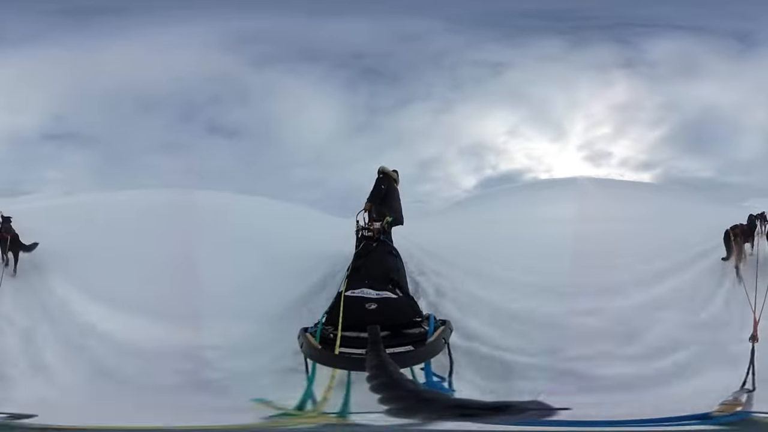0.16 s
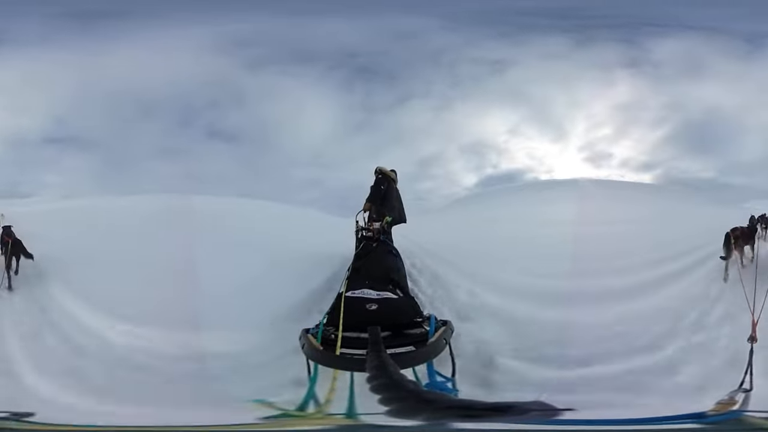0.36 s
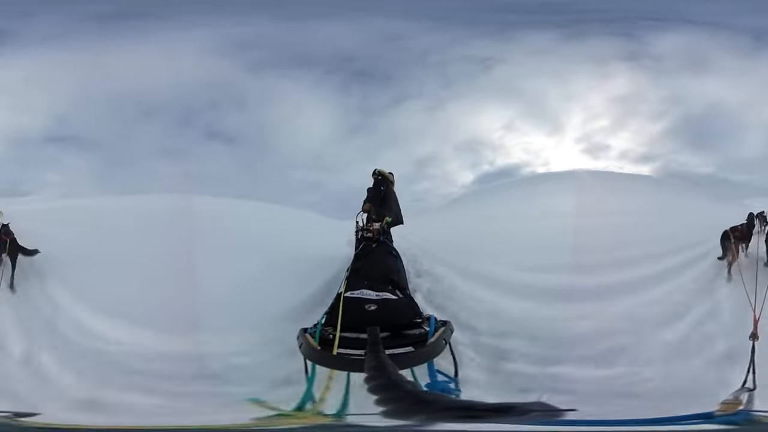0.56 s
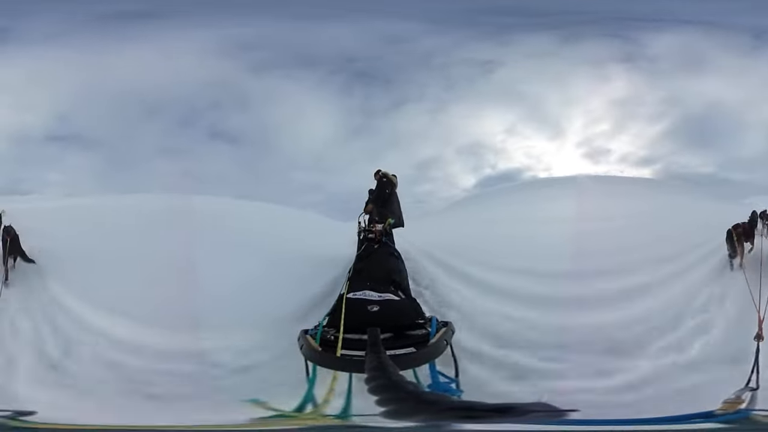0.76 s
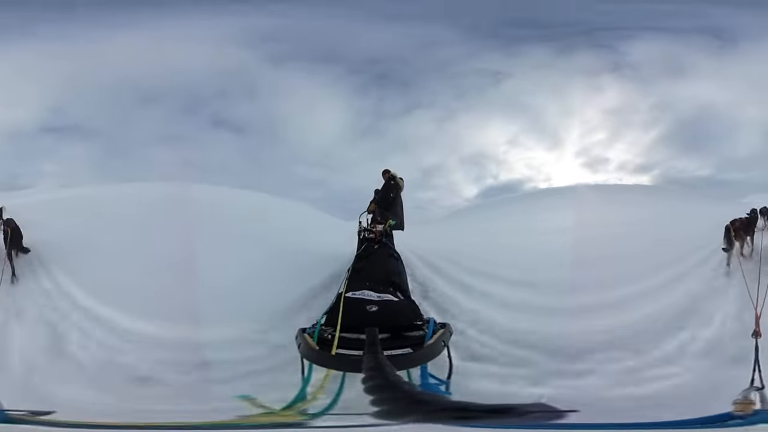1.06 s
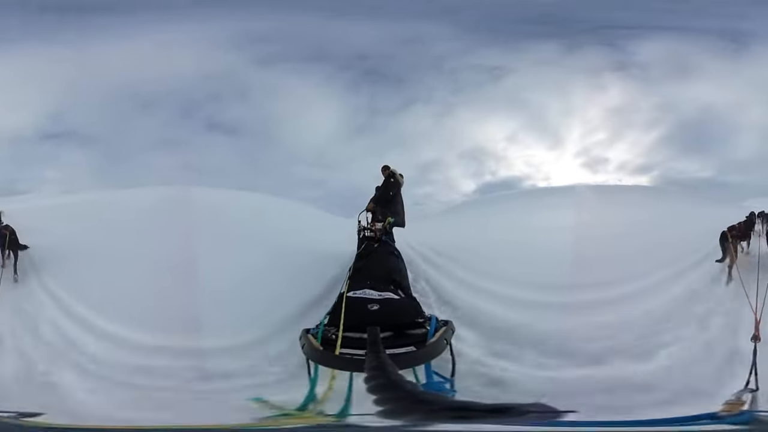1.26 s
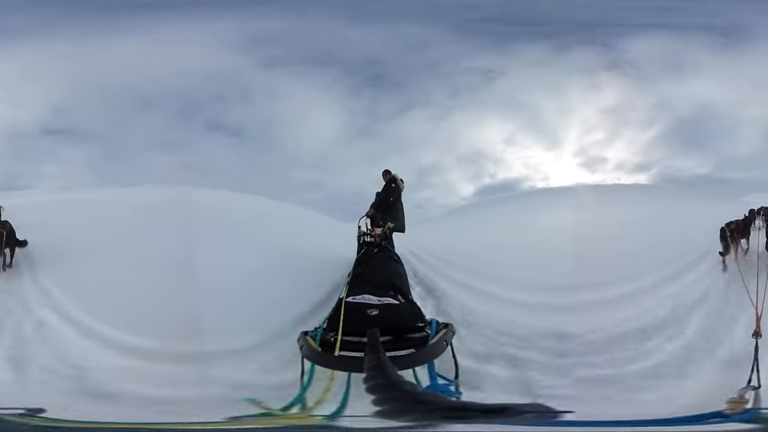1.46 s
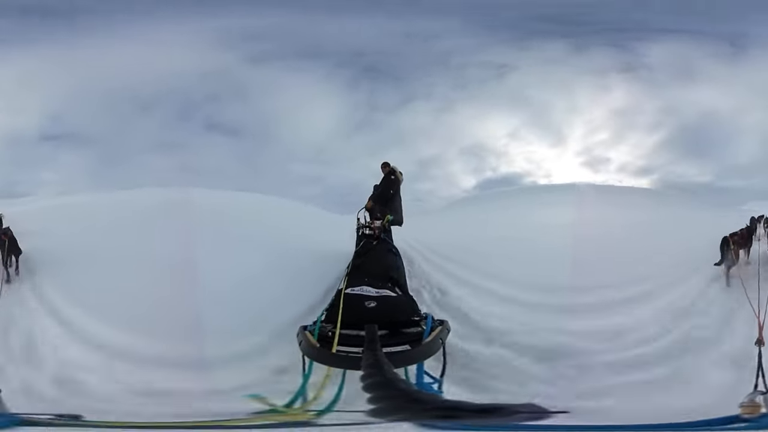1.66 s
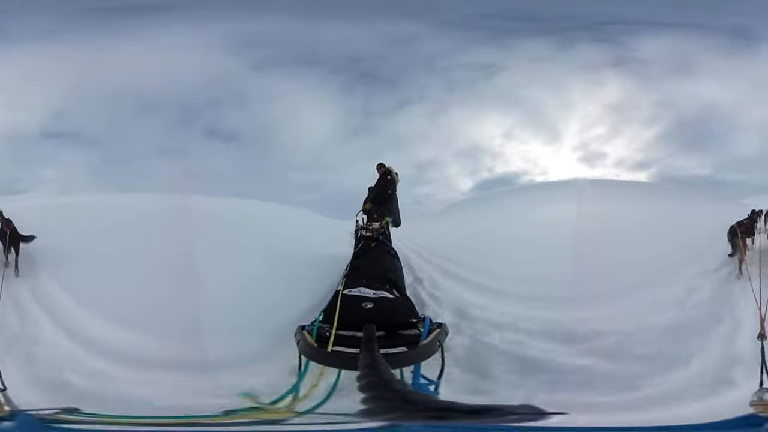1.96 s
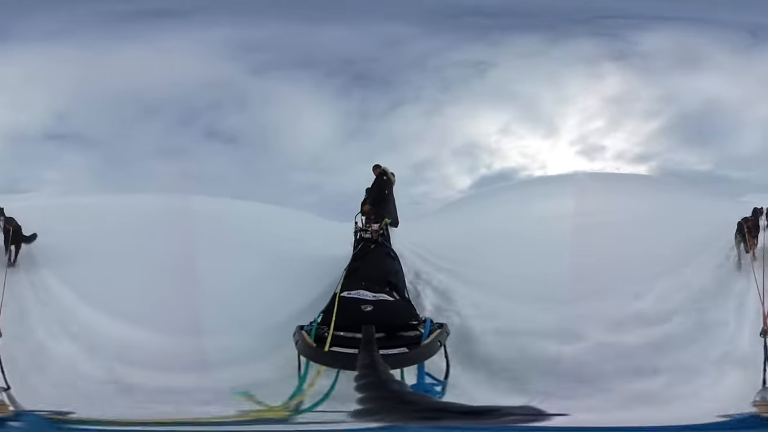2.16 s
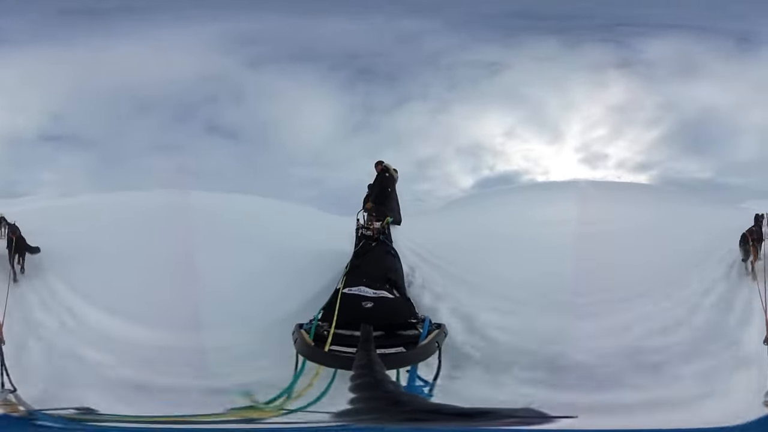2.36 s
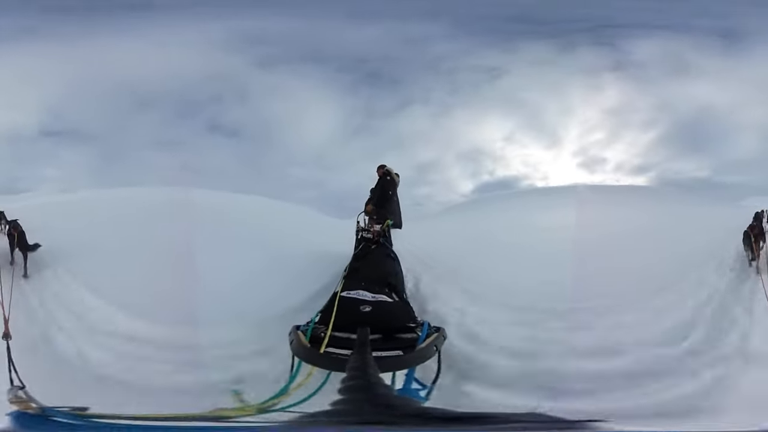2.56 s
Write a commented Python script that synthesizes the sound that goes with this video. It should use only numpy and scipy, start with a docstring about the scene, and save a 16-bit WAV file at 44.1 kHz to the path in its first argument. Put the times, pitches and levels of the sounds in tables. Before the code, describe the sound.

Dog sled runners crunch over packed snow, with a hollow frame drone, jolts and ticking ice crumbs

```python
"""An open field of packed snow: a dog sled runs over it, heard from a mount on the sled's bow.
The runners crunch through breaking snow grains and keep the frame droning near 400 Hz.
Fine snow and ice crumbs set the housing ringing, a little wind rumbles, and the sled thuds softly.
Bumps add a burst of crushed snow and a juddering tone of the frame; the hardest overload the microphone."""
import sys
import numpy as np
from scipy import signal
from scipy.fft import rfft, irfft, next_fast_len
from scipy.io import wavfile
from scipy.ndimage import uniform_filter1d

SR = 44100
rng = np.random.default_rng(int(sys.argv[2]) if len(sys.argv) > 2 else 0)


def to_wav(sig):
    """Store sig (one row per channel, or 1-D mono) as 16-bit WAV at the path in sys.argv[1].

    Samples outside -1..1 are clipped; the rate is SR.
    """
    pcm = np.clip(np.atleast_2d(sig), -1, 1) * 32767
    pcm = np.round(pcm).astype(np.int16)
    wavfile.write(sys.argv[1], SR, pcm.T)  # frames by channels


N = 120393  # length in samples
TIME = np.arange(N) / SR


def from_db(db):
    """Turn decibels into a gain."""
    return 10 ** (np.asarray(db) / 20)


def rms_one(x):
    """Scale a sound to an average strength (rms) of 1."""
    return x / np.sqrt(np.mean(x ** 2) + 1e-20)


def in_time(rows):
    """Join the points of a table by straight lines over time."""
    return np.interp(TIME, *np.transpose(rows))


def drift(hz):
    """Smooth random wandering with spread 1; a higher hz wanders faster."""
    step = 40  # make one value every 40 samples, then join them
    r = np.exp(-2 * np.pi * hz * step / SR)
    noise = rng.standard_normal(N // step + 2002)
    slow = signal.lfilter([1], [1, -2 * r, r * r], noise)[2000:]  # skip the start-up
    return np.interp(np.arange(N) / step, np.arange(len(slow)), rms_one(slow))


def colour(x, points):
    """Filter a sound to follow a spectrum without smearing it backwards in time; rms 1."""
    size = 2 * next_fast_len(N)
    hz, db = np.transpose(points)
    bins_hz = np.arange(size // 2 + 1) * SR / size
    shape_db = np.interp(np.log(bins_hz + 1), np.log(hz), db)
    # keeping only the first half of the cepstrum makes the filter act forwards in time
    cepstrum = irfft(np.log(from_db(shape_db)))
    cepstrum[size // 2:] = 0
    response = np.exp(2 * rfft(cepstrum))
    return rms_one(irfft(rfft(x, size) * response)[:N])


def ring(x, hz, t60):
    """Each unit click starts a sine of height 1 that dies away by 60 dB in t60 seconds."""
    r = from_db(-60 / (t60 * SR))
    w = 2 * np.pi * hz / SR
    return signal.lfilter([0, np.sin(w)], [1, -2 * r * np.cos(w), r * r], x + 1e-18)


def resonate(x, hz, width):
    """Pass a sound through one resonance, width in Hz; rms 1."""
    r = np.exp(-np.pi * width / SR)
    w = 2 * np.pi * hz / SR
    return rms_one(signal.lfilter([1, 0, -1], [1, -2 * r * np.cos(w), r * r], x))


def grains(per_s, spread_db):
    """Clicks at random moments, many small and a few large."""
    sizes = from_db(spread_db * np.minimum(rng.exponential(1, N), 4))
    signs = rng.choice([-1, 1], N)
    return sizes * signs * (rng.random(N) < per_s / SR)


def even(x, seconds):
    """Take out the slow swells and keep the fast roughness."""
    power = uniform_filter1d(x ** 2, int(seconds * SR))
    return x / np.sqrt(np.maximum(power, 1e-9))


def around(start):
    """The samples from 10 ms before a short event to 100 ms after its start."""
    at = int(start * SR)
    return slice(max(at - SR // 100, 0), at + SR // 10)


GRAINS_PER_S, GRAIN_SPREAD_DB = 1500, 3.2
CRUST_PER_S, CRUST_CYCLES = 600, 25  # cracks of all pitches together; cycles to fade by 60 dB
CRUST_LOW_HZ, CRUST_HIGH_HZ = 643, 3780


def crust():
    """Small slabs of crust crack and ring briefly at scattered pitches, the low ones louder."""
    pitches = np.geomspace(CRUST_LOW_HZ, CRUST_HIGH_HZ, 14)
    out = np.zeros(N)
    for hz in pitches:
        cracks = grains(CRUST_PER_S / len(pitches), GRAIN_SPREAD_DB)
        out += ring(cracks, hz, CRUST_CYCLES / hz) / np.sqrt(hz)
    return rms_one(out)


# how hard the runners grind, before the lurching: start_s, level_db (relative)
GLIDE_LEVEL = [(0, -31.5), (.09, -26.5), (.16, -19.5), (.25, -23), (.34, -18), (.42, -23.5), (.49, -23),
               (.54, -23.5), (.66, -22.5), (.73, -25), (.8, -25.5), (.83, -34), (.88, -24), (.96, -20),
               (1.02, -29.5), (1.08, -28), (1.13, -24.5), (1.2, -27), (1.225, -29.5), (1.28, -21),
               (1.37, -24.5), (1.5, -22), (1.6, -19), (1.65, -24.5), (1.72, -23), (1.81, -17.5),
               (1.89, -21), (1.97, -22.5), (2.04, -19.5), (2.16, -19.5), (2.24, -19.5), (2.44, -21),
               (2.53, -19.5), (2.58, -24), (2.63, -18), (2.67, -26), (2.73, -23.5)]
# spectrum of the snow breaking under the runners: pitch_hz, level_db (per Hz, relative)
SNOW_SPECTRUM = [(150, -37), (300, -6.5), (520, 6), (800, 11.5), (1200, 6), (1800, 4), (2600, -7),
                 (3600, -13), (5500, -20.5), (7800, -36), (9000, -41.5), (11400, -37)]
# resonances of the sled frame: pitch_hz, width_hz, level_db (relative)
FRAME_RESONANCES = [(406, 37.5, 0.5), (668, 23, -8), (920, 76, -22), (2338, 43, -17.5)]
SNOW_DB, CRUST_DB = -3, -5
LURCH_DB, LURCH_HZ = 2.83, 45.7  # size and speed of the uneven load


def runners():
    """Snow grains break unevenly under the runners and shake the frame."""
    load = from_db(in_time(GLIDE_LEVEL) + LURCH_DB * drift(LURCH_HZ))
    snow = from_db(SNOW_DB) * colour(grains(GRAINS_PER_S, GRAIN_SPREAD_DB), SNOW_SPECTRUM)
    frame = np.zeros(N)
    for hz, width, db in FRAME_RESONANCES:
        drone = resonate(rng.standard_normal(N), hz, width)
        frame += from_db(db) * even(drone, seconds=.03)
    return load * (snow + frame + from_db(CRUST_DB) * crust())


# ringing tones of the housing: pitch_hz, level_db (relative), fade_s (time to fall by 60 dB)
HOUSING_TONES = [(2394, -5, 0.0065), (2960, -14, 0.012), (3250, -9, 0.0035), (5260, -16, 0.0036),
                 (6900, -20, 0.0057), (8060, -23.5, 0.009), (9950, -18, 0.006), (11320, -12, 0.0044)]


def housing(clicks):
    """Clicks set off the short, bright ring of the housing; every second tone is flipped in sign."""
    out = np.zeros(N)
    for k, (hz, db, t60) in enumerate(HOUSING_TONES):
        out += from_db(db) * ring(clicks, hz, t60) * (-1) ** k
    return out


# how strongly fine snow hits the housing: start_s, level_db (relative)
SPRAY_LEVEL = [(0, -36), (.1, -69), (.18, -30), (.24, -33), (.275, -43), (.33, -35), (.39, -30.5),
               (.44, -44), (.5, -64), (.56, -68), (.66, -38), (.72, -33.5), (.78, -27), (.83, -51),
               (.93, -67), (.99, -36), (1.025, -27), (1.08, -47), (1.19, -33), (1.33, -65), (1.5, -34),
               (1.64, -45), (1.72, -62), (1.83, -59), (1.9, -76), (2.03, -60), (2.1, -25), (2.2, -48),
               (2.34, -65), (2.49, -44), (2.57, -61), (2.73, -65.5)]
STRAY_PER_S, STRAY_SPREAD_DB, STRAY_DB = 200, 3, 5.5
POWDER_PER_S, POWDER_SPREAD_DB, POWDER_DB = 1300, 3.5, -2.5


def spray():
    """Stray grains and fine powder patter on the housing and make it ring."""
    stray = from_db(STRAY_DB) * housing(grains(STRAY_PER_S, STRAY_SPREAD_DB))
    powder = from_db(POWDER_DB) * rms_one(housing(grains(POWDER_PER_S, POWDER_SPREAD_DB)))
    return from_db(in_time(SPRAY_LEVEL)) * (stray + powder)


# spectrum of the wind on the microphone: pitch_hz, level_db (per Hz, relative)
WIND_SPECTRUM = [(15, -14), (30, -6), (45, 3), (65, -0.5), (115, -5.5), (170, -7.5), (280, -10), (600, -23),
                 (4000, -86)]
# strength of the wind, before the gusts: start_s, level_db (relative)
WIND_STRENGTH = [(0, -29.5), (.17, -26.5), (.42, -29), (.55, -30.5), (.7, -32), (.9, -32.5), (1.15, -37),
                 (1.25, -32), (1.55, -32.5), (1.68, -35), (1.8, -32.5), (1.95, -31.5), (2.1, -26),
                 (2.38, -31), (2.55, -27), (2.62, -29.5), (2.73, -22.5)]
WIND_DB = 0.5
GUST_DB, GUST_HZ = 0.3, 6  # size and speed of the small gusts


def wind():
    """Passing air makes a low, lumpy rumble: noise with most of its strength in the bass."""
    level_db = WIND_DB + in_time(WIND_STRENGTH) + GUST_DB * drift(GUST_HZ)
    return from_db(level_db) * colour(rng.standard_normal(N), WIND_SPECTRUM)


# ice crumbs that hit the housing: start_s, strength_db (relative)
CRUMB_HITS = [(0.0698, -17), (0.1391, -14), (0.2049, -12), (0.2137, 2), (0.238, -15), (0.2849, -17),
              (0.3122, -7), (0.3505, -15), (0.3779, -7), (0.4212, -17), (0.4692, -18), (0.5287, -13),
              (0.5634, -16), (0.62, -16), (0.6408, 0), (0.7592, 0), (0.8541, -7), (0.9312, -15),
              (1.0118, 1), (1.0219, -14), (1.121, -13), (1.1824, -11), (1.1902, -15), (1.1983, -15),
              (1.2478, -13), (1.2665, -16), (1.275, -14), (1.3805, -9), (1.3928, -17), (1.4278, -13),
              (1.4916, -16), (1.5037, -11), (1.5196, -7), (1.5605, -9), (1.6297, -9), (1.6378, -1),
              (1.6661, -5), (1.6789, -14), (1.7023, -13), (1.735, -10), (1.7488, -15), (1.7684, -12),
              (1.7947, -15), (1.8311, -11), (1.9772, -10), (1.9842, -13), (2.0128, -11), (2.0558, -15),
              (2.0706, 0), (2.0775, -8), (2.0899, -9), (2.1089, -14), (2.1359, -9), (2.1424, -16),
              (2.1707, -12), (2.18, -10), (2.2038, -16), (2.2217, -17), (2.2838, -14), (2.3861, -17),
              (2.4046, -17), (2.4256, -4), (2.4692, -15), (2.5464, -18), (2.5532, -17), (2.6193, -5),
              (2.6777, -17), (2.721, -11)]
CRUMB_DB = 1.5
CRACK_DB, CRACK_S = -1, 0.0007  # the first crack and its decay time
SHATTER_DB, SHATTER_S = -27.5, 0.0063  # the smaller bits and their decay time


def crumbs():
    """Ice crumbs strike the housing, crack at once and shatter into smaller bits."""
    clicks, debris = np.zeros(N), np.zeros(N)
    for start, db in CRUMB_HITS:
        at = int(start * SR)
        t = TIME[:min(SR // 10, N - at)]
        span = slice(at, at + len(t))
        crack = rng.standard_normal(len(t)) * np.exp(-np.minimum(t / CRACK_S, 20))
        clicks[at] += from_db(db)
        clicks[span] += from_db(db + CRACK_DB) * crack / np.linalg.norm(crack)
        debris[span] += from_db(db) * np.exp(-t / SHATTER_S)
    bits = from_db(SHATTER_DB) * debris * rms_one(grains(POWDER_PER_S, POWDER_SPREAD_DB))
    return from_db(CRUMB_DB) * housing(clicks + bits)


# soft thuds of the sled: start_s, length_s, pitch_hz, level_db
THUD_HITS = [(.072, .015, 124, -25.5), (0.169, 0.014, 109, -22.5), (.245, 0.012, 134, -31),
             (0.443, 0.02, 104, -28.5), (0.773, 0.0043, 172, -17), (0.786, 0.0047, 277, -17.5),
             (1.52, 0.029, 287, -22), (2.21, 0.027, 135, -26)]


def thuds():
    """The loaded sled settles: a short low tone swells and fades in a bell shape."""
    out = np.zeros(N)
    for start, length, hz, db in THUD_HITS:
        span = around(start)
        t = TIME[span] - start
        bell = np.exp(-(2 * t / length - 1) ** 2 / 2)
        tone = np.sqrt(2) * np.sin(2 * np.pi * (hz * t + rng.random()))
        out[span] += from_db(db) * bell * tone
    return out


JOLT_ATTACK_S, JOLT_DECAY_S = 0.0068, 0.0048


def jolt_shape(t, length):
    """A bump's loudness: rounded rise, hold while the bump lasts, quick decay."""
    rise = np.sin(np.pi / 2 * np.clip(t / JOLT_ATTACK_S + .5, 0, 1)) ** 2
    return rise * np.exp(-np.clip((t - length) / JOLT_DECAY_S, 0, 20))


# bumps: start_s, length_s, frame_pitch_hz (before wander), frame_level_db (relative),
# crunch_level_db (relative), crunch_pitch_hz
BUMPS = [(0.29, 0.011, 392.5, -6.5, -18.5, 950), (0.306, 0.0069, 400, -47, -14, 1150),
         (0.554, 0.01, 414, -21, -20.5, 1210), (0.582, 0.0072, 415, 2, -3, 1050),
         (0.601, 0.012, 335, -6, -21, 1080), (0.622, 0.011, 404, -12, -14.5, 1010),
         (0.682, 0.013, 424, -14, -25.5, 700), (0.85, 0.012, 390, -10, -14, 796),
         (0.975, 0.021, 414, -7.5, -19.5, 830), (1.129, 0.0073, 370, -17, -42, 660),
         (1.144, 0.0034, 417, -29, -39, 990), (1.194, .01, 398, -16, -16.5, 660),
         (1.241, 0.0039, 394, -4.5, -6.5, 750), (1.320, 0.031, 378, -12, -22.5, 1080),
         (1.374, 0.013, 400, -16.5, -12, 740), (1.417, 0.018, 413, -8.5, -18.5, 770),
         (1.4428, .011, 400, -6.5, -5, 798), (1.493, 0.011, 395, -10.5, -14, 786),
         (1.524, 0.015, 406, -4, -14.5, 940), (1.558, 0.0096, 411.6, -8.5, -10, 810),
         (1.586, 0.018, 430, -16, -19.5, 920), (1.678, 0.0079, 400, -12, -15.5, 746),
         (1.748, 0.0037, 414, -17, -11, 1500), (1.846, 0.016, 420, -11.5, -18.5, 880),
         (1.917, 0.0023, 420, -2, -41, 800), (1.933, 0.046, 420, -12.5, -22.5, 640),
         (2.002, 0.011, 384, -3, -7, 770), (2.107, 0.0038, 390, -5.5, -17, 740),
         (2.165, 0.031, 364, -12.5, -13.5, 710), (2.271, 0.018, 395, -9.5, -18.5, 690),
         (2.297, 0.024, 397, -6, -21.5, 670), (2.336, 0.018, 395, -10.5, -45, 700),
         (2.362, 0.028, 387, -11, -27, 790), (2.395, 0.011, 391.4, -1, -16.5, 850),
         (2.414, 0.0079, 365, -7.5, -12, 775), (2.466, 0.05, 410, -9, -13.5, 880),
         (2.613, .016, 400, -25, -14, 880), (2.72, 0.011, 424, -12, -13.5, 860)]
# spectrum of the snow crushed at a bump: pitch_hz, level_db (per Hz, relative)
CRUNCH_SPECTRUM = [(150, 2), (300, 1.5), (520, -9.5), (800, 6.5), (1200, 3.5), (1800, -4), (2600, 0.5),
                   (3600, -15), (5500, -27), (7800, -34), (9000, -44), (11400, -23)]
JOLT_FRAME_DB, JOLT_CRUNCH_DB = -3.1, -1.13
JOLT_GRIT_DB, JOLT_RING_DB, JOLT_RING_WIDTH_HZ = -3.5, -1, 137
PITCH_WANDER = 0.063  # spread, as a fraction of the pitch


def jolts():
    """Each bump crushes snow with a hollow ring and makes the frame judder at an unsteady pitch."""
    out = np.zeros(N)
    clock = np.cumsum(1 + PITCH_WANDER * drift(hz=91.2)) / SR  # uneven time bends the pitch
    crushed = grains(2 * GRAINS_PER_S, GRAIN_SPREAD_DB)
    grit = from_db(JOLT_GRIT_DB) * colour(crushed, CRUNCH_SPECTRUM)
    rub = rng.standard_normal(N)
    for start, length, hz, frame_db, crunch_db, crunch_hz in BUMPS:
        span = around(start)
        shape = jolt_shape(TIME[span] - start, length)
        cycles = hz * (clock[span] - clock[span][0]) + rng.random()
        judder = np.sqrt(2) * np.sin(2 * np.pi * cycles)
        hollow = resonate(rub[span], crunch_hz, JOLT_RING_WIDTH_HZ)
        # give the hollow ring the same strength in every bump
        hollow = from_db(JOLT_RING_DB) * hollow / np.sqrt(np.average(hollow ** 2, weights=shape))
        frame = from_db(JOLT_FRAME_DB + frame_db) * judder
        crunch = from_db(JOLT_CRUNCH_DB + crunch_db) * (grit[span] + hollow)
        out[span] += shape * (frame + crunch)
    return out


SLED_LOW_HZ = 204


def scene():
    """Everything is close and dry: open snow gives no echo. The runners and bumps carry little bass."""
    bass_cut = signal.butter(2, SLED_LOW_HZ, "high", fs=SR, output="sos")
    sled = signal.sosfilt(bass_cut, runners() + jolts())
    return (sled + thuds() + crumbs() + spray() + wind())[None]


OVERLOAD, KNEE = .63, 10  # the highest level that gets through; a larger knee bends more sharply
CUTOFF_HZ, TOP_HZ, LEAK_DB = 12080, 15500, -30


def record(dry):
    """Loud peaks overload the input; the top is cut, with a faint remainder above it."""
    clipped = dry / (1 + np.abs(dry / OVERLOAD) ** KNEE) ** (1 / KNEE)
    cut = signal.fftconvolve(clipped, signal.firwin(301, CUTOFF_HZ, fs=SR)[None], "same")
    top_cut = signal.butter(12, TOP_HZ, fs=SR, output="sos")
    return signal.sosfilt(top_cut, cut + from_db(LEAK_DB) * clipped)


dry = scene()
out = record(dry)
to_wav(out)
```